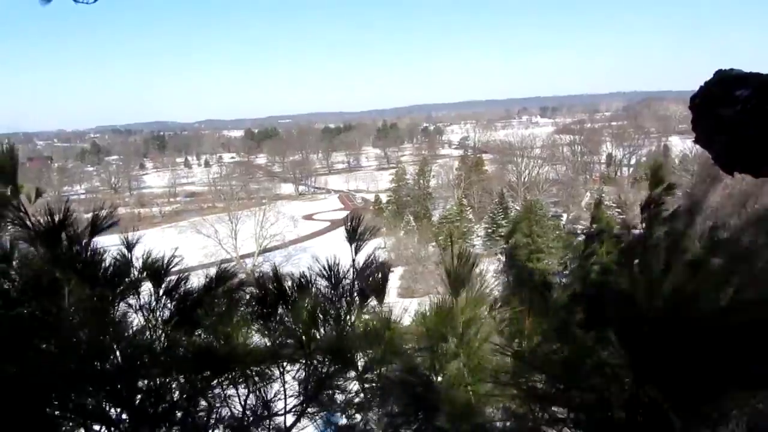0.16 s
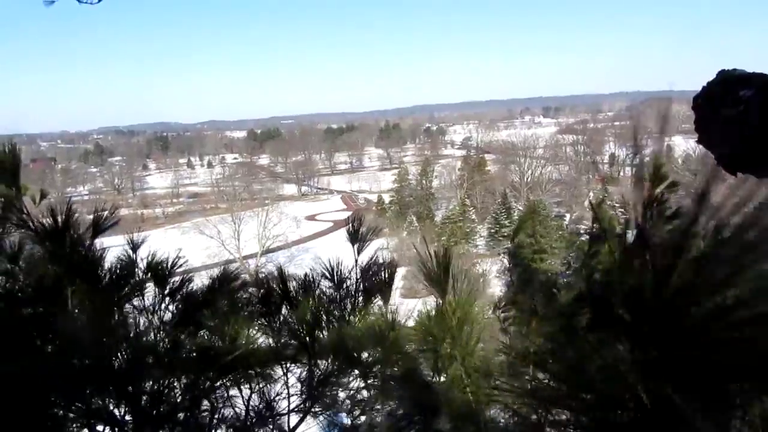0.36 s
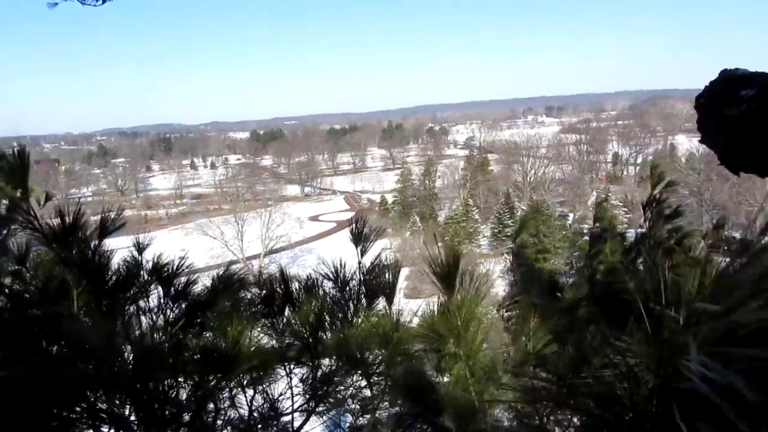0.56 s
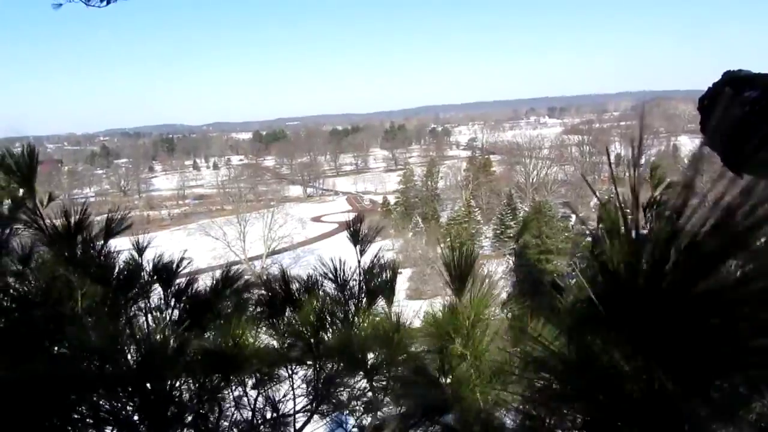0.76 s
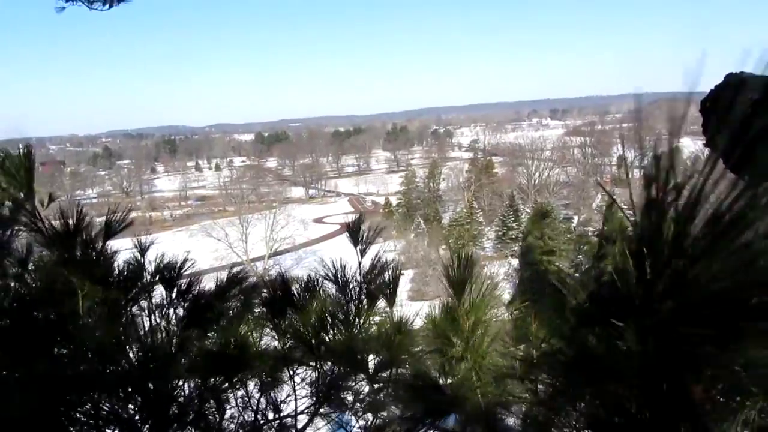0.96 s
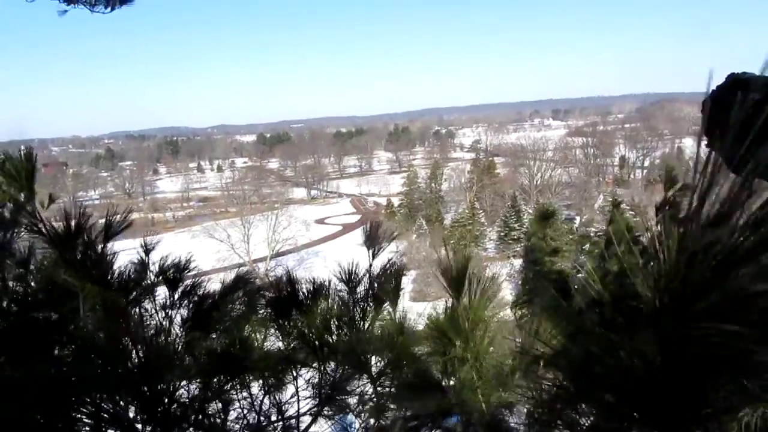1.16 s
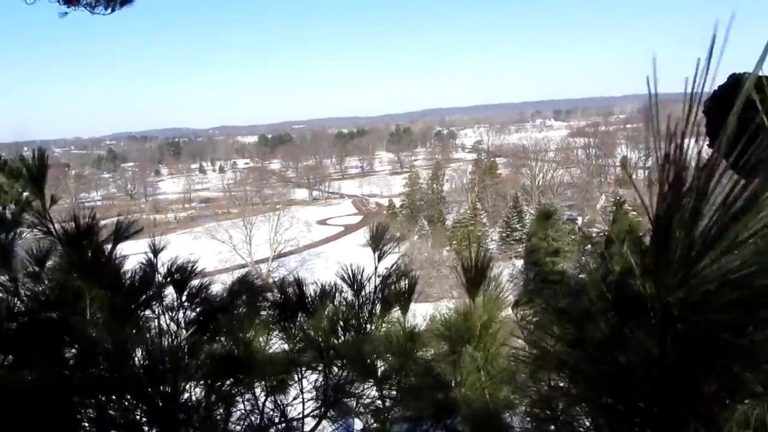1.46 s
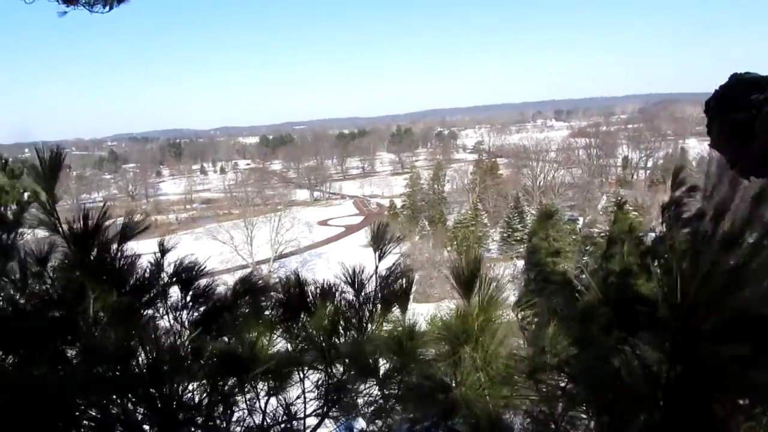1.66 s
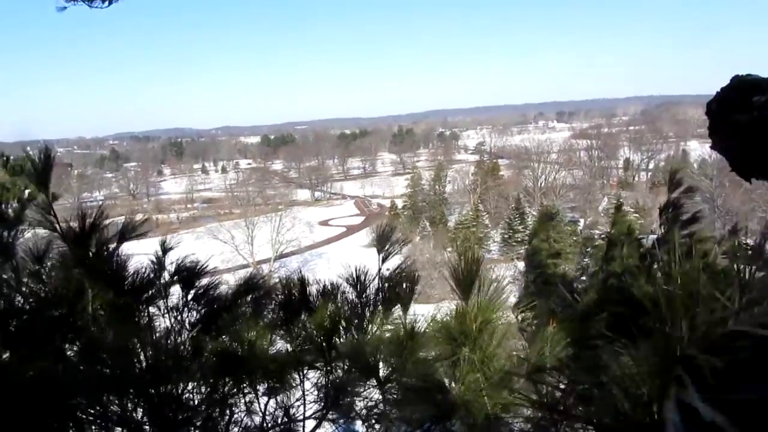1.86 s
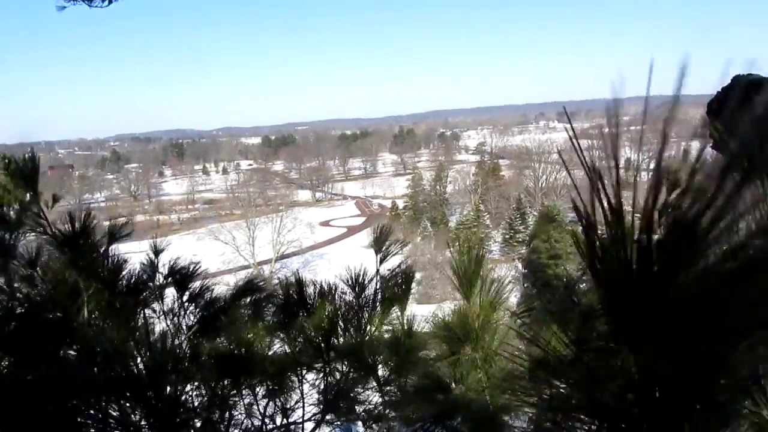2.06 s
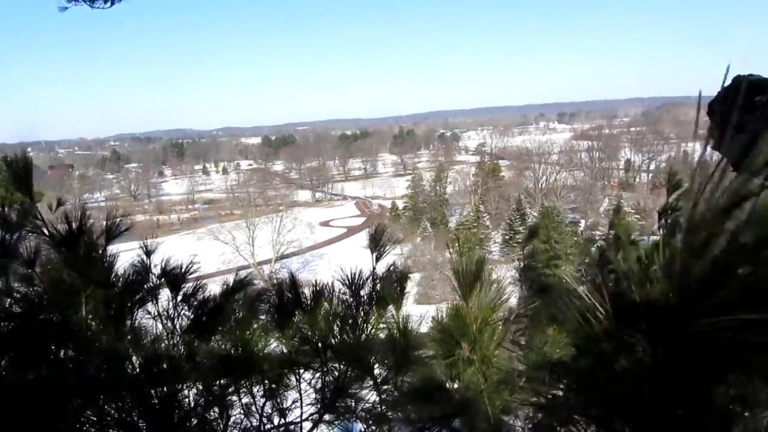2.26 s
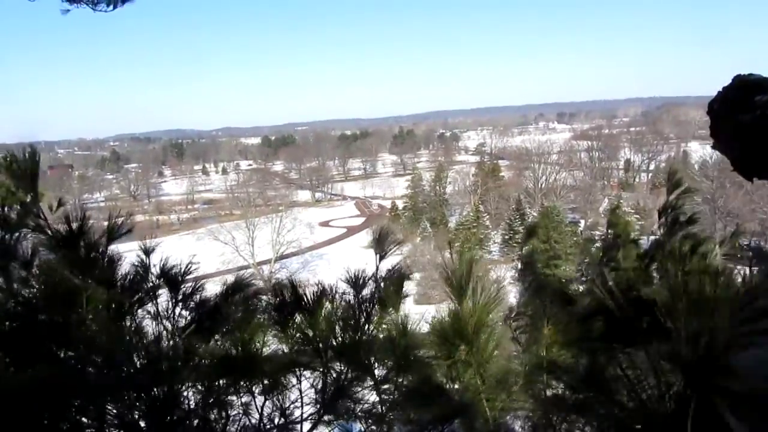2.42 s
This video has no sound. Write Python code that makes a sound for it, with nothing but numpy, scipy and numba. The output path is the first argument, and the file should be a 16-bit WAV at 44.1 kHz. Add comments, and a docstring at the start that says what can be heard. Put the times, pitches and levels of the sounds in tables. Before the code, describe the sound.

Wind rumbles and slaps hard against an exposed microphone, with a soft steady rush through pines

```python
"""Wind on a hilltop among pines

Needles hiss steadily: shaped noise, wide in the treble. Eddies buffet two microphone ports: low rumble and
short fluttering puffs from evened-out noise, hard slaps from pressure pulses, cracks from noise bursts.
Buffeting leaks inverted and a little late into the other channel. A gain control starts turned down,
drops under the hardest slaps and creeps back, so the hiss swells after them."""
import sys
import numpy as np
from scipy import signal
from scipy.fft import rfft, irfft
from scipy.io import wavfile
from scipy.ndimage import uniform_filter1d
from numba import njit

SR = 44100
rng = np.random.default_rng(int(sys.argv[2]) if len(sys.argv) > 2 else 0)


def int16_out(signal):
    """Quantize to a 16-bit WAV file."""
    q = np.round(np.clip(np.atleast_2d(signal).T, -1, 1) * 32767)
    wavfile.write(sys.argv[1], SR, q.astype(np.int16))


N = 114219

# hard single eddies: peak_s, peak_db (both ports' power together), sigma_ms, right_power_share (0-1)
SLAPS = [(0.024, -9.5, 0.74, 0), (.056, -3.5, 0.73, 0.02), (0.161, 3.5, 1.09, 0.01),
         (0.2549, 0.5, 0.58, 0.01), (.2768, -2.5, .7, 0), (0.2984, 0.5, 0.78, 0), (0.39, -10, 0.39, 0),
         (0.3969, -6, 0.77, 0), (0.4255, 3, 1.04, 0), (0.4773, -3.5, 0.6, 0), (.521, -6.5, 0.63, 0),
         (.613, -10.5, 0.59, 0.02), (.6262, 0.5, 0.93, 0), (0.711, -11.5, 0.47, 0), (0.7556, 1, 0.6, 0),
         (.7628, -2, 0.5, 0), (.787, -8.5, 0.49, 0), (.817, -12, 0.39, 0.09), (.8323, -4.5, 0.53, 0),
         (0.8512, -5, 0.54, 0), (1.0766, -0.5, 0.74, 0), (1.1406, 2, 0.51, 0), (1.343, -11, 1.03, 0),
         (1.697, -12.5, .9, 0.03), (1.7588, -3, 0.63, 0), (1.7662, 6, 0.99, 0.01), (1.805, -2, 0.77, 0),
         (1.985, -15.5, 0.45, 0.02), (2.2276, -6.5, 0.52, 0), (2.2506, -1.5, 0.57, 0),
         (2.311, -9, 2.3, 0.03), (2.359, -7.5, 1.21, 1), (2.416, -6, 1.3, 0.05), (2.5752, -2.5, 0.63, 1)]
# rumble spectrum, relative: freq_hz, density_db
RUMBLE_SPECTRUM = [(20, -22.5), (40, -18), (65, -2.5), (110, 0.5), (180, -2), (260, -11.5), (400, -22.5),
                   (800, -46), (2000, -78.5), (6000, -120)]


def undb(db):
    """Decibels to amplitude gain."""
    return 10 ** (np.asarray(db) / 20)


def curve(rows):
    """Straight lines through (s, value) points."""
    return np.interp(np.arange(N) / SR, *np.array(rows).T)


def over_hz(rows):
    """Straight lines through (Hz, value) points on a log frequency axis."""
    hz, value = np.array(rows).T
    return np.interp(np.log(np.fft.rfftfreq(N, 1 / SR) + 1), np.log(hz), value)


def noise(spectrum, weight=1):
    """Gaussian noise shaped to a spectrum at unit RMS, then weighted by frequency."""
    gain = undb(over_hz(spectrum))
    gain = gain / np.sqrt(np.mean(gain ** 2))
    return irfft(rfft(rng.standard_normal(N)) * weight * gain, N)


def drift(rate_hz):
    """Random drift: unit-normal steps at rate_hz, smoothed over one step."""
    step = int(SR / rate_hz)
    steps = np.repeat(rng.standard_normal(N // step + 1), step)
    return uniform_filter1d(steps, step)[:N]


def churn(spectrum):
    """Turbulent pressure: shaped noise divided by its own short-term RMS, for a nearly even strength."""
    even_s = 0.026
    window = int(even_s * SR)
    pressure = noise(spectrum)
    power = uniform_filter1d(uniform_filter1d(pressure ** 2, window), window)
    return pressure / np.sqrt(power + 0.06)  # floor limits the boost of lulls


def ports(right_share):
    """Amplitude gains of the left and right port for a right share of the power."""
    return np.sqrt([[1 - right_share], [right_share]])


def pines():
    """Air rushing through needles: mid and side noise set the left-right correlation; a faint flicker."""
    # hiss spectrum, relative: freq_hz, density_db
    hiss_spectrum = [(60, -9.5), (250, -5.5), (500, 1.5), (900, 3), (1300, -2.5), (2000, -9), (3000, -17.5),
                     (3900, -25.5), (5000, -26), (6500, -32.5), (9000, -38.5), (12000, -50), (15500, -54)]
    # left-right likeness: freq_hz, correlation
    likeness = [(100, 0.8), (800, 0.74), (1500, 0.43), (2600, 0.1), (4000, -0), (9000, 0.2)]
    # wind strength in the crowns: time_s, level_db
    breeze = [(0, -46.5), (.3, -47), (.6, -46), (.9, -47.5), (1.3, -44), (1.7, -46.5), (2.0, -44.5),
              (2.59, -43.5)]
    sway_db, sway_hz = 0.25, 6.94
    needle_db, needle_hz = 0.9, 40.22
    left_minus_right_db = -0.9

    correlation = over_hz(likeness)
    mid = noise(hiss_spectrum, np.sqrt((1 + correlation) / 2))
    side = noise(hiss_spectrum, np.sqrt((1 - correlation) / 2))
    common_db = curve(breeze) + sway_db * drift(sway_hz)
    channels = []
    for sign in (1, -1):  # left, right
        level_db = common_db + sign * left_minus_right_db / 2 + needle_db * drift(needle_hz)
        channels.append((mid + sign * side) * undb(level_db))
    return np.array(channels)


def draught():
    """Light turbulence between puffs: flickering rumble, independent on each port."""
    # rumble strength, both ports' power together: time_s, level_db
    strength = [(0, -28.5), (.1, -21.5), (.3, -21.5), (.57, -24.5), (.8, -19.5), (.92, -22.5), (1.1, -22),
                (1.21, -28.5), (1.36, -25.5), (1.6, -25), (1.66, -33.5), (1.8, -19), (1.95, -26.5),
                (2.11, -25.5), (2.2, -21), (2.4, -27), (2.59, -17)]
    flicker_db, flicker_hz, right_share = 3, 30.215, 0.46
    rumble = np.array([churn(RUMBLE_SPECTRUM) * undb(flicker_db * drift(flicker_hz)) for _ in range(2)])
    return rumble * ports(right_share) * undb(curve(strength))


def puffs(t):
    """Gusts on the ports: rumble swells and dies within hundredths of a second, ragged flutter at its height."""
    # puffs: centre_s, length_s (rumble, between 1/e points), rumble_db, flutter_db (before the trim),
    # right_power_share (0-1)
    gusts = [(0.018, 0.04, -12.5, -24, 0.04), (0.06, 0.019, -12, -22, 0.03),
             (0.156, 0.022, -12.5, -20, 0.04), (0.202, 0.051, -14.5, -25, 0.03),
             (.256, 0.036, -9, -14, 0.07), (0.288, 0.034, -7, -18, 0.06), (0.338, .025, -14, -19.5, .05),
             (0.397, 0.044, -8, -14, 0), (0.435, 0.014, -13.5, -24, 0.02), (0.473, 0.032, -7, -21, 0),
             (0.531, 0.051, -9.5, -25, 0.01), (0.625, 0.04, -9.5, -26, 0.09),
             (0.667, 0.041, -15.5, -43, 0.12), (0.711, 0.022, -10.5, -25.5, 0),
             (0.757, 0.02, -8.5, -11, 0.02), (0.795, 0.039, -22, -20.5, 0), (.835, 0.056, -10.5, -22.5, 0),
             (0.966, 0.037, -17, -23, 0.06), (0.992, 0.024, -26, -31, .05), (1.073, 0.058, -18.5, -22, 0),
             (1.141, 0.026, -12.5, -14, 0.06), (1.247, 0.017, -18.5, -44.5, 0),
             (1.281, 0.031, -16.5, -58, .05), (1.348, 0.016, -21, -31, .05), (1.424, 0.2, -20.5, -36, 0.32),
             (1.571, .03, -19.5, -37, 0.75), (1.619, 0.024, -20, -42, 0.88), (1.698, .02, -16.5, -31, .05),
             (1.75, 0.032, -13.5, -21, 0.05), (1.806, .025, -10, -18.5, .05), (1.985, 0.016, -14, -21.5, 0),
             (2.046, 0.02, -13.5, -22, 0.01), (2.172, 0.055, -13, -27, 0.01),
             (2.228, 0.042, -9.5, -12.5, .25), (2.314, 0.031, -17, -41, 0.63),
             (2.362, 0.054, -16, -24.5, 0.88), (2.411, 0.043, -11.5, -33, 0.18),
             (2.505, 0.016, -14.5, -43, 0.2), (2.571, 0.029, -8, -25.5, .6)]
    # flutter spectrum, relative: freq_hz, density_db
    flutter_spectrum = [(80, -23.5), (180, -5), (290, 2), (430, -1.5), (620, -13.5), (900, -24),
                        (1400, -41), (3000, -70), (8000, -98), (15000, -120)]
    flank_power = 3.54  # steepness of the flanks
    flutter_length = 0.78  # share of the rumble's length
    patchy_db, patchy_hz, flutter_trim_db = 4, 160, -1.5

    rumble = np.array([churn(RUMBLE_SPECTRUM) for _ in range(2)])
    flutter = np.array([churn(flutter_spectrum) for _ in range(2)])
    flaps = undb(patchy_db * drift(patchy_hz) + flutter_trim_db)
    rumble_gain, flutter_gain = np.zeros((2, N)), np.zeros((2, N))
    for centre_s, length_s, rumble_db, flutter_db, right_share in gusts:
        near = abs(t - centre_s) < 2 * length_s
        away = abs(2 * (t[near] - centre_s) / length_s)  # in half lengths
        swell = np.exp(-away ** flank_power)
        short_swell = np.exp(-(away / flutter_length) ** flank_power)
        rumble_gain[:, near] += undb(rumble_db) * swell * ports(right_share)
        flutter_gain[:, near] += undb(flutter_db) * short_swell * ports(right_share)
    return rumble_gain * rumble + flutter_gain * flutter * flaps


def slaps(t):
    """Eddies hitting a port: a Gaussian pressure peak minus a wider, later suction of equal area."""
    suction_width, suction_lag = 1.96, 0.49  # in peak sigmas
    out = np.zeros((2, N))
    for peak_s, peak_db, sigma_ms, right_share in SLAPS:
        near = abs(t - peak_s) < 0.05
        u = (t[near] - peak_s) * 1000 / sigma_ms
        peak = np.exp(-0.5 * u ** 2)
        suction = np.exp(-0.5 * ((u - suction_lag) / suction_width) ** 2) / suction_width
        pulse = peak - suction
        out[:, near] += undb(peak_db) * pulse / pulse.max() * ports(right_share)
    return out


def dip(t):
    """Turbulence dips briefly around each slap, so the slap stands clear and sets the peak."""
    dip_s, depth = 0.0051, 0.55
    away_s = np.min([abs(t - row[0]) for row in SLAPS], axis=0)
    return 1 - depth * np.exp(-(away_s / dip_s) ** 2)


def cracks(t):
    """Overload, mostly of the left port, by the two hardest slaps: brief Gaussian bursts of raspy noise."""
    # bursts: centre_s, level_db, dulling_db_per_khz
    bursts = [(0.16, -19, 5), (1.767, -23, 3.5)]
    # rasp spectrum before dulling, relative: freq_hz, density_db
    rasp_spectrum = [(300, -3.5), (800, 3), (1500, -8), (3000, -18), (6000, -23), (10000, -31),
                     (15500, -43)]
    sigma_s, right_share = 0.00092, 0.13
    khz = np.fft.rfftfreq(N, 1 / SR) / 1000
    rasp = np.zeros(N)
    for centre_s, level_db, dull_db_khz in bursts:
        envelope = np.exp(-0.5 * ((t - centre_s) / sigma_s) ** 2)
        rasp += noise(rasp_spectrum, undb(level_db - dull_db_khz * khz)) * envelope
    return ports(right_share) * rasp


def scene():
    """Buffeting with its inverted, delayed leak between channels, over the hiss of the trees."""
    leak_db, leak_lag_s = -6.5, 0.00018
    t = np.arange(N) / SR
    wind = (draught() + puffs(t)) * dip(t) + slaps(t)
    leak = np.array([np.interp(t - leak_lag_s, t, port) for port in wind[::-1]])
    return wind - undb(leak_db) * leak + cracks(t) + pines()


@njit
def ride(over_db, gain_db, attack, recover_db):
    """Gain in dB: drops by a share of the excess per sample, else creeps back up to 0."""
    out = np.empty(len(over_db))
    for i in range(len(over_db)):
        excess_db = over_db[i] + gain_db
        if excess_db > 0:
            gain_db = gain_db - attack * excess_db
        else:
            gain_db = min(gain_db + recover_db, 0.0)
        out[i] = gain_db
    return out


def record(dry):
    """One smoothed gain control for both channels, end fade, hard clipping, treble cut-off."""
    threshold, start_db = 0.67, -6.0  # threshold as amplitude
    attack_s, recover_db_per_s, smooth_s = 0.00039, 5, 0.0034
    fade_s, cutoff_hz = 0.004, 15700

    over_db = 20 * np.log10(abs(dry).max(axis=0) / threshold + 1e-9)
    gain = undb(ride(over_db, start_db, 1 / (attack_s * SR), recover_db_per_s / SR))
    window = int(smooth_s * SR)
    gain = uniform_filter1d(uniform_filter1d(gain, window), window)
    left_s = np.arange(N)[::-1] / SR
    fade = np.sin(np.pi / 2 * np.minimum(left_s / fade_s, 1)) ** 2
    clipped = np.clip(dry * gain * fade, -1, 1)
    lowpass = signal.ellip(8, 0.2, 70, cutoff_hz, fs=SR, output="sos")
    return signal.sosfilt(lowpass, clipped)


dry = scene()
out = record(dry)
int16_out(out)
```